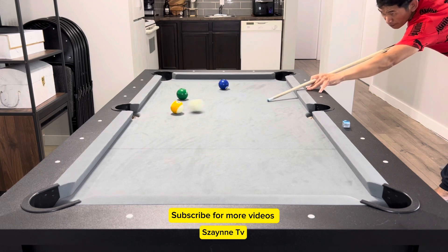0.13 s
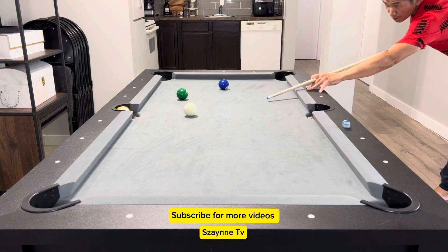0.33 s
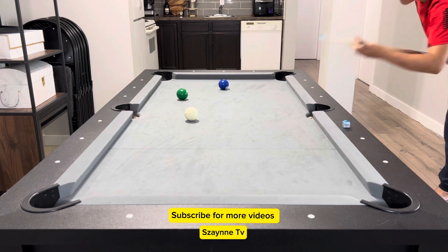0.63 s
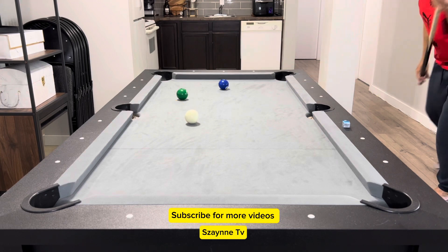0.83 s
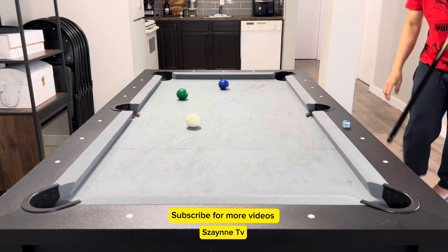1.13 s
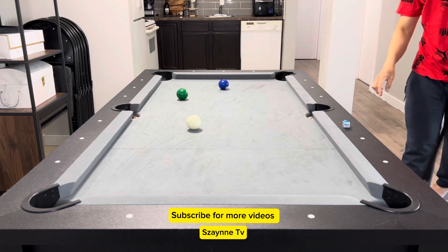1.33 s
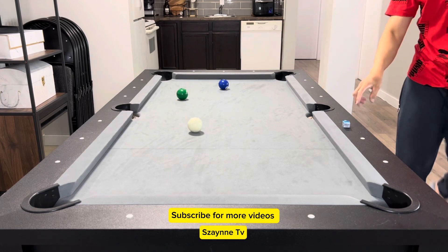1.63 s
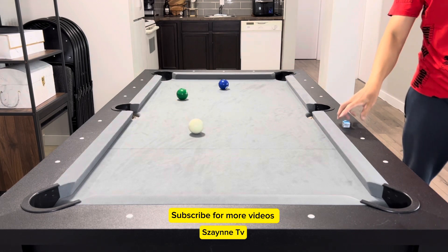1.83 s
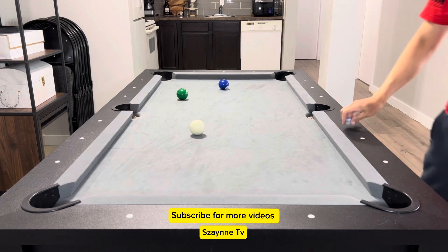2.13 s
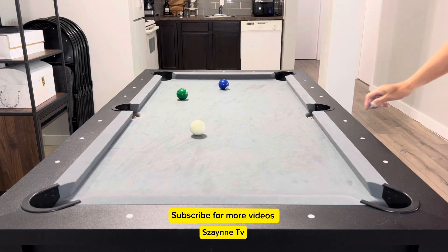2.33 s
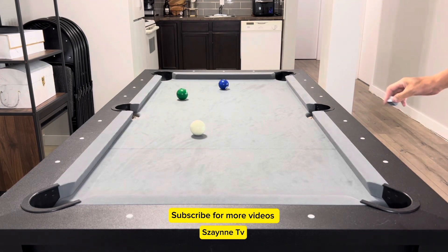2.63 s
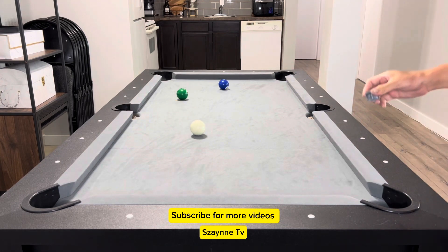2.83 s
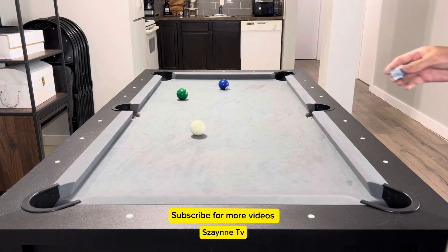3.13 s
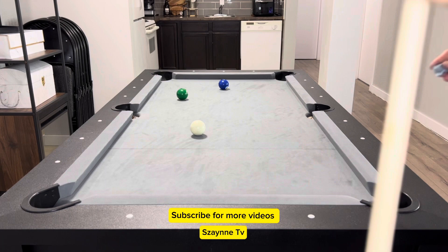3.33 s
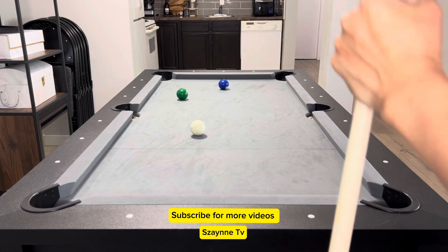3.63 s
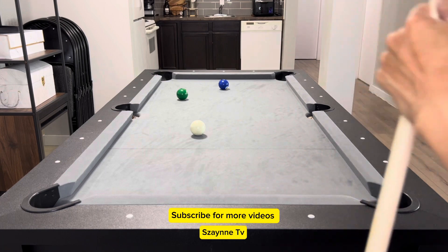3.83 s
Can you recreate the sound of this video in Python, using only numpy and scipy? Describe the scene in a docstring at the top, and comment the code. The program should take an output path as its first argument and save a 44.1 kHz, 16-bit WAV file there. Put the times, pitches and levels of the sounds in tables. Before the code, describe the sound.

A billiard ball is struck, clicks another into a pocket, then soft clothing rustle follows

```python
"""A pool shot in a bare home room, on a phone's two microphone ports, over a faint appliance hum.
The cue thumps and its ring dies away; the cue ball clicks on a ball, which thuds into a side pocket
and drops on the balls lying there, over a fading rumble of the table bed. The player then walks round
with rustling clothes, a creak and a scuff, picks up the chalk and taps it on the cue. Contacts are
shaped pulses with echoes and a noise tail; ringing is decaying sines; air and cloth are shaped noise."""
import sys
import numpy as np
from scipy import signal
from scipy.fft import rfft, irfft
from scipy.io import wavfile
from scipy.ndimage import uniform_filter1d, map_coordinates

SR = 44100
rng = np.random.default_rng(int(sys.argv[2]) if len(sys.argv) > 2 else 0)


def waveform_to_disk(signal):
    """Save audio, clipped to [-1, 1], as 16-bit WAV at the path in sys.argv[1]."""
    frames = np.transpose(np.atleast_2d(signal))
    scaled = np.clip(frames, -1, 1) * 32767
    samples = np.round(scaled).astype(np.int16)
    wavfile.write(sys.argv[1], SR, samples)


N = 176400  # samples, 4 s

# Steady room air, spectrum shape: freq_hz [Hz], level_db [dB per Hz, relative]
AIR_SPECTRUM = [(12, -31), (20, -8.5), (65, -5.5), (120, -12.5), (140, -20.5), (171, -5.5), (196, -18),
                (261, -19), (286, -19), (428, -21.5), (478, -25), (559, -21), (874, -34.5), (1000, -34.5),
                (1370, -31.5), (2610, -35), (4180, -55), (5430, -88.5), (9200, -120)]
# Faint hiss of the room, spectrum shape: freq_hz [Hz], level_db [dB per Hz, relative]
HISS_SPECTRUM = [(200, -9.5), (2500, 0.5), (8500, -7.5), (10000, -15.5), (12500, -0.5), (15500, -10)]
AIR_DB, HISS_DB = -60, -86  # dB rms
# Appliance hum partials: pitch_hz [Hz], level_db [dB rms, before wavering]
HUM_PARTIALS = [(72, -70), (170, -79.5), (296, -75.5)]

# Early reflections from cloth, rails and wall: delay_s [s], level_db [dB], left_over_right_db [dB]
REFLECTIONS = [(.0045, -6, 5.5), (.0056, -8.5, -3), (.0077, -8.5, 12.5), (0.0142, -13.5, 11.5)]
# Room decay by frequency: freq_hz [Hz], t60_s [s to fall 60 dB]
ROOM_DECAY = [(60, .7), (150, 0.7), (400, 0.7), (1000, 0.68), (2500, 0.68), (5000, 0.48), (13000, 0.31)]
ROOM_RISE_S, ROOM_PAN_DB = 0.0059, 2
ALIKE_HZ = 411  # above this the two ports hear ever less of the same noise
FULL_PAN_HZ = 220  # well above this a level difference reaches its full size
PORT_LAG_S = .00007  # direct contacts reach the right port later

# Swishes of clothing: centre_s [s], half_length_s [s], level_db [dB, relative],
# tilt_db [dB per octave, about 3500 Hz]
CLOTH_SWISHES = [(0.89, 0.16, -72, 2), (1.197, 0.21, -95, 9.5), (1.515, 0.1, -74, -3),
                 (1.594, 0.12, -77, -.5), (2.033, 0.054, -75.5, 1.5), (2.123, 0.093, -70, -1),
                 (2.23, 0.093, -76.5, 0), (2.612, 0.071, -67, 1), (2.728, 0.12, -70.5, 5),
                 (2.797, 0.089, -70, .5), (2.983, 0.2, -82, 7), (3.2, 0.11, -103.5, 18.5),
                 (3.43, 0.11, -71.5, 2), (3.549, 0.12, -70.5, 0), (3.869, 0.044, -72, 2.5),
                 (3.976, 0.033, -72, 4.5)]
# Cloth friction spectrum: freq_hz [Hz], level_db [dB, relative]
CLOTH_SPECTRUM = [(150, -17.5), (500, 2.5), (950, 1.5), (1700, 4), (2700, -1), (5000, -5.5), (8500, -10),
                  (10000, -33), (12300, -2.5), (15500, -21)]
# A shoe scuffing the floor, spectrum: freq_hz [Hz], level_db [dB per Hz, relative]
SCUFF_SPECTRUM = [(150, -10), (350, -2), (600, -1), (1150, -3), (1450, -11.5), (1900, -11), (3000, -27.5),
                  (8000, -44)]
SCUFF_S, SCUFF_SPREAD_S, SCUFF_DB = 2.025, 0.036, -52
CREAK_S, CREAK_SPREAD_S, CREAK_HZ, CREAK_DB = 1.922, .033, 280, -59

# All contact events below: start_s [s], level_db [dB, relative], direct_db [dB, added to direct sound]
# Footfalls through the floor
FOOTFALLS = [(1.46, -59.5, -0.5), (1.56, -58, 6.5), (2.08, -59, -2), (2.17, -57.5, 8), (2.22, -59, -7.5),
             (3.718, -46.5, 2), (3.748, -54, 15), (3.783, -57, 14)]
# Chalk and cue being handled
CHALK_TAPS = [(1.882, -57.5, 5), (3.208, -48.5, 7.5), (3.329, -48.5, 8.5), (3.348, -61, 2),
              (3.712, -61, 15), (3.866, -60.5, 8.5)]
# The cue stroke, dying away
CUE_BLOWS = [(0.0, -9.5, 7), (0.058, -19.5, -3)]
# Ball on ball in the open
BALL_CLICKS = [(0.1843, -4.5, 2.5)]
# Ball on the pocket's jaw and liner
POCKET_THUDS = [(0.33, -25, -7), (0.4162, -5.5, 3.5), (0.4452, -13, 6.5), (0.4675, -10.5, -2)]
# Ball dropping on the balls in the pocket
POCKET_LANDING = [(0.6885, -9.5, -5.5), (0.6918, -14.5, 3), (0.728, -18, -21), (0.785, -17.5, -23)]
# Sharp little contacts of ball and cue
SMALL_TICKS = [(0.001, -26.5, -16), (0.1844, -35, 10), (0.329, -32, 4.5), (0.468, -37, 3.5),
               (0.568, -39.5, -9), (0.684, -39, 13), (0.692, -29.5, -5), (3.2, -49.5, 2), (3.222, -70, 26),
               (3.556, -53, 3), (3.713, -57, 17), (3.868, -49, 6)]

# All contact spectra below: freq_hz [Hz], level_db [dB, relative]
# Footfall
FOOTFALL_SPECTRUM = [(20, 0), (45, -9), (68, 16.5), (110, 0), (150, -1), (210, -17.5), (300, -17.5),
                     (600, -68), (2000, -70)]
# Chalk or cue tap
TAP_SPECTRUM = [(80, -17), (300, 4.5), (600, 4.5), (1150, -3), (1500, -2), (2000, -3.5), (3500, -16.5),
                (8000, -38), (15000, -36)]
# Cue thump
CUE_SPECTRUM = [(40, -11), (90, -10), (140, 1.5), (205, -8), (310, 2.5), (420, -5), (600, -2.5), (900, -9),
                (1250, -17), (2000, -19), (3500, -30.5), (7000, -37), (15000, -47.5)]
# Ball on ball in the open
CLICK_SPECTRUM = [(100, -26.5), (400, -24), (800, -19), (1400, -6), (2000, -1), (2700, 1.5), (3500, -6),
                  (4500, -13), (5500, -22), (7000, -50.5), (15000, -58)]
# Pocket thud
THUD_SPECTRUM = [(50, -21), (130, -16), (300, -4), (450, -4), (680, 2), (950, 2), (1250, -8.5), (1700, -15),
                 (2500, -23), (4000, -39.5), (8000, -58.5), (15000, -85.5)]
# Ball on balls in the pocket
LANDING_SPECTRUM = [(100, -30), (400, -20), (850, -5), (1350, 4), (2000, 2), (2700, 3), (3600, -1.5),
                    (4500, -10), (5500, -21), (7000, -51), (15000, -77)]
# Sharp tick
TICK_SPECTRUM = [(200, -10), (1500, 2.5), (3500, 2), (6000, 2.5), (8500, -2.5), (10000, -31.5), (12300, 4),
                 (15500, -11)]
# Rumble of balls rolling on the table bed (per Hz)
ROLL_SPECTRUM = [(15, -7), (30, -6), (70, 1.5), (100, -9), (200, -11), (2000, -49.5)]
ROLL_DB, ROLL_FADE_DB_PER_S = -43, 14.5  # level at the start, then its fall

# All ringing modes below: pitch_hz [Hz], level_db [dB, relative], t60_s [s to fall 60 dB]
# Table and room after the stroke
TABLE_MODES = [(70, -19.5, 1.6), (136, -11, 0.51), (160.5, 0.5, .5), (475, -12.5, 0.43), (556, -15, .4),
               (296, -12.5, .6), (332.8, -10, .45), (732, -21, .5), (830, -18, 0.25), (1084, -22.5, 0.52)]
# Cue shaft after the stroke
CUE_SHAFT_MODES = [(1480, -1.5, 0.35), (1981, -11.5, 0.69), (3050, -9, 0.31)]
# Pocket and table frame
POCKET_FRAME_MODES = [(69, -17.5, 1.5), (139, -7, .55), (231, -11.5, 0.7), (300, -5, 0.65),
                      (346.2, -10.5, .4), (575, -2.5, 0.66), (615.6, 3, 0.4), (726, 3.5, .45),
                      (741.2, -4, 0.86), (818, -3, 0.56), (872, -14.5, .7), (918, 5.5, .4),
                      (1055, -13.5, .36), (1080, -1.5, .36), (1110, -2.5, .33), (1230, -4, .36)]
TABLE_RING_DB, SHAFT_RING_DB, POCKET_RING_DB = -4, -17, -15  # against the hardest blow
RING_RISE_S = 0.0027

TOP_HZ = 15800  # upper limit of the phone's sound


def undb(db):
    """Decibels to gain."""
    return 10 ** (np.asarray(db) / 20)


def along(points, hz):
    """Read (Hz, value) points on a log-frequency axis."""
    f, v = np.array(points, float).T
    return np.interp(np.log(np.maximum(hz, 1)), np.log(f), v)


def freqs(size):
    """Frequencies of a transform's bins."""
    return np.fft.rfftfreq(size, 1 / SR)


def decay(t, t60):
    """Exponential fall of 60 dB in t60 seconds."""
    return np.exp(-np.log(1000) * t / t60)


def pan(db):
    """Left and right gains for a level difference, positive to the left."""
    return undb(np.array([[db], [-db]]) / 2)


def lean(db, hz):
    """Left and right gains by frequency: long waves reach both ports equally."""
    return pan(db) ** (1 / (1 + (FULL_PAN_HZ / (2 * hz + 1)) ** 2))


def unit(x):
    """Scale to rms 1."""
    return x / np.sqrt(np.mean(x ** 2))


def walk(rate):
    """Random wander of spread 1, with about `rate` new values a second."""
    hold = max(int(SR / rate), 1)
    steps = np.repeat(rng.standard_normal(N // hold + 2), hold)
    return unit(uniform_filter1d(steps, hold)[:N])


def diffuse(size):
    """Spectrum of stereo noise from all around: alike in the bass, nearly unrelated above."""
    mid, side = rfft(rng.standard_normal((2, size)))
    alike = np.clip(0.075 + 0.88 / (1 + (freqs(size) / ALIKE_HZ) ** 3), 0, 1)
    opposed = side * np.sqrt(1 - alike) * np.array([[1], [-1]])
    return (mid * np.sqrt(1 + alike) + opposed) / np.sqrt(2)


def coloured(spectrum):
    """Diffuse noise over the whole take, shaped to a spectrum in dB."""
    return irfft(diffuse(N) * undb(along(spectrum, freqs(N))))


def contact(tone, size=4096):
    """The short causal pulse of one contact, peak 1."""
    # Folding the cepstrum forward in time gives minimum phase: an abrupt onset
    cepstrum = irfft(np.log(undb(along(tone, freqs(size)))))
    cepstrum[1:size // 2] *= 2
    cepstrum[size // 2 + 1:] = 0
    pulse = irfft(np.exp(rfft(cepstrum)))
    return pulse / np.abs(pulse).max()


def add(out, x, at_s):
    """Mix a sound in at a given time."""
    i = max(int(at_s * SR), 0)
    out[:, i:i + x.shape[-1]] += x[..., :max(N - i, 0)]


def room_tail(size=49152):
    """Diffuse reverberation of energy near 1, each octave with its own decay."""
    t, hz = np.arange(size) / SR, freqs(size)
    noise = diffuse(size) * lean(ROOM_PAN_DB, hz)
    centres = 62.5 * 2. ** np.arange(9)
    place = np.interp(np.log(hz + 1), np.log(centres), np.arange(len(centres)))
    tail = 0
    for k, centre_hz in enumerate(centres):
        band = irfft(noise * np.maximum(1 - abs(place - k), 0))  # triangular, overlapping octaves
        tail = tail + band * decay(t, along(ROOM_DECAY, centre_hz))
    tail = tail * (1 - np.exp(-t / ROOM_RISE_S))
    return unit(tail) / np.sqrt(size)


def blows(rows, tone, room_db, pan_db, echo_db=-2):
    """Contacts heard directly, off the nearest surfaces and through the room."""
    pulse = contact(tone)
    late = map_coordinates(pulse, [np.arange(len(pulse)) - PORT_LAG_S * SR])
    ports = np.array([pulse, late])
    direct, to_room, echoes = np.zeros((3, 2, N))
    for start_s, level_db, direct_db in rows:
        add(direct, ports * undb(level_db + direct_db), start_s)
        add(to_room, pulse * undb(level_db + room_db), start_s)
    for delay_s, level_db, side_db in REFLECTIONS:
        add(echoes, direct * undb(level_db + echo_db) * pan(side_db), delay_s)
    reverb = signal.fftconvolve(to_room, room_tail(), axes=1)[:, :N]
    return echoes + direct * pan(pan_db) + reverb


def ring(rows, modes, ring_db, pan_db, lag_s):
    """Modes that swell and die away for one second after the hardest blow of a group."""
    out, t = np.zeros((2, N)), np.arange(SR) / SR
    t = np.maximum(t - np.array([[0], [lag_s]]), 0)  # right port later
    body = 0
    for hz, mode_db, t60 in modes:
        tone = np.sin(2 * np.pi * hz * t + rng.uniform(0, 2 * np.pi))
        body = body + undb(mode_db) * lean(pan_db, hz) * tone * decay(t, t60)
    start_s, level_db, _ = max(rows, key=lambda row: row[1])
    add(out, body * (1 - np.exp(-t / RING_RISE_S)) * undb(level_db + ring_db), start_s)
    return out


def background():
    """Room air and hiss as shaped noise, and an appliance hum of slightly wavering sines."""
    t = np.arange(N) / SR
    air = unit(coloured(AIR_SPECTRUM)) * undb(AIR_DB + 0.43 * walk(3.3))
    hum = 0
    for hz, db in HUM_PARTIALS:
        level = np.sqrt(2) * undb(db + 1.5 * walk(12))
        hum = hum + level * np.sin(2 * np.pi * hz * t + .7 * walk(3.4))
    hiss = unit(coloured(HISS_SPECTRUM)) * undb(HISS_DB)
    return (air + hum + hiss) * pan(.6)


def clothes():
    """Swishes of cloth: grainy friction noise, brighter or duller with each movement."""
    t, hz = np.arange(N) / SR, freqs(N)
    coarse_t = t[::64]
    rub = irfft(diffuse(N)) * undb(1.4 * walk(60) + 2 * walk(770))
    cloth = rfft(unit(irfft(rfft(rub) * undb(along(CLOTH_SPECTRUM, hz)))))
    octaves = np.arange(-3, 3)  # about 3500 Hz
    place = np.clip(np.log2((hz + 1) / 3500), octaves[0], octaves[-1])
    out = 0
    for k in octaves:
        power = 0
        for centre_s, half_s, db, tilt in CLOTH_SWISHES:
            away = np.minimum(abs(coarse_t - centre_s) / half_s * 2, 20)
            power = power + undb(db + tilt * k) ** 2 / np.cosh(away) ** 2
        band = irfft(cloth * np.maximum(1 - abs(place - k), 0))
        out = out + band * np.interp(t, coarse_t, np.sqrt(power))
    return out * undb(9.0) * pan(3.1)


def scuff():
    """A short gritty swell of a sole sliding on the floor: noise with a rough level."""
    t = np.arange(N) / SR
    grit = coloured(SCUFF_SPECTRUM) * undb(1.1 * walk(90))
    swell = np.exp(-((t - SCUFF_S) / SCUFF_SPREAD_S) ** 2 / 2)
    return unit(grit) * swell * undb(SCUFF_DB) * pan(1.7)


def player():
    """Soft steps, one low creak of the floor as narrow-band noise, and taps of the chalk."""
    t = np.arange(N) / SR
    creak = unit(irfft(diffuse(N) * np.exp(-((freqs(N) - CREAK_HZ) / 110) ** 2)))
    creak = creak * np.exp(-((t - CREAK_S) / CREAK_SPREAD_S) ** 2 / 2) * undb(CREAK_DB)
    steps = blows(FOOTFALLS, FOOTFALL_SPECTRUM, room_db=6.5, pan_db=0, echo_db=-20)
    taps = blows(CHALK_TAPS, TAP_SPECTRUM, room_db=8.5, pan_db=0, echo_db=-0.5)
    return creak + steps + taps


def rolling():
    """Low rumble of the table bed under the slowing balls: noise that steadily fades."""
    t = np.arange(N) / SR
    return unit(coloured(ROLL_SPECTRUM)) * undb(ROLL_DB - ROLL_FADE_DB_PER_S * t)


def cue_stroke():
    """The thump of the cue, with the table and the shaft ringing on."""
    thump = blows(CUE_BLOWS, CUE_SPECTRUM, room_db=9, pan_db=7)
    table = ring(CUE_BLOWS, TABLE_MODES, TABLE_RING_DB, pan_db=2.0, lag_s=0.00018)
    shaft = ring(CUE_BLOWS, CUE_SHAFT_MODES, SHAFT_RING_DB, pan_db=2, lag_s=.00003)
    return thump + table + shaft


def balls():
    """Hard clicks of ball on ball and the hollow thud of the pocket with its ringing frame."""
    clicks = blows(BALL_CLICKS, CLICK_SPECTRUM, room_db=6, pan_db=4.5, echo_db=-0.5)
    thuds = blows(POCKET_THUDS, THUD_SPECTRUM, room_db=3, pan_db=4, echo_db=-2.5)
    frame = ring(POCKET_THUDS, POCKET_FRAME_MODES, POCKET_RING_DB, pan_db=2.5, lag_s=.0003)
    landing = blows(POCKET_LANDING, LANDING_SPECTRUM, room_db=4.5, pan_db=8, echo_db=-7)
    ticks = blows(SMALL_TICKS, TICK_SPECTRUM, room_db=12.5, pan_db=3.5, echo_db=-3.5)
    return clicks + thuds + frame + landing + ticks


def scene():
    """The room, the player moving round the table, and the shot."""
    surroundings = background() + clothes() + scuff() + player()
    return surroundings + rolling() + cue_stroke() + balls()


def record(dry):
    """The phone holds peaks under full scale by soft saturation, then cuts the top."""
    held = dry / (1 + dry ** 8) ** (1 / 8)
    low_pass = signal.ellip(8, .2, 70, TOP_HZ, fs=SR, output="sos")
    return signal.sosfilt(low_pass, held)


dry = scene()
out = record(dry)
waveform_to_disk(out)
```